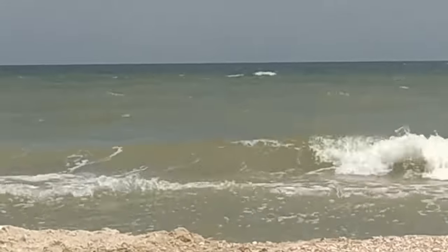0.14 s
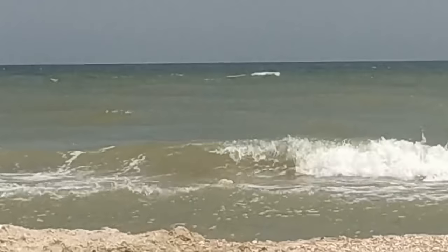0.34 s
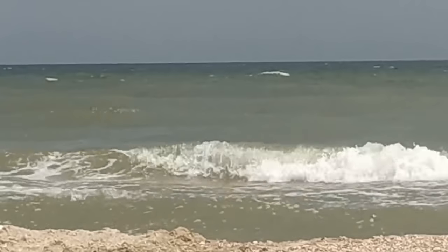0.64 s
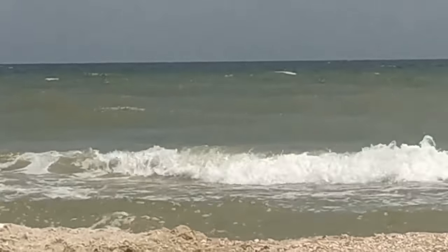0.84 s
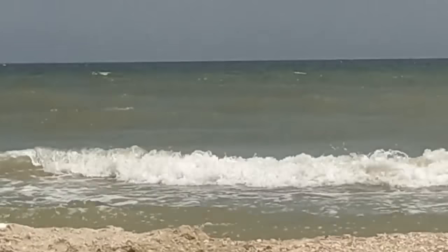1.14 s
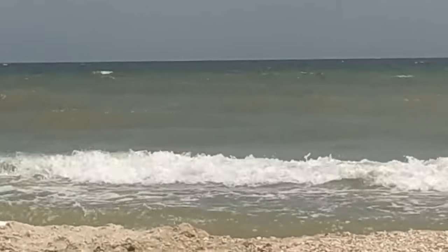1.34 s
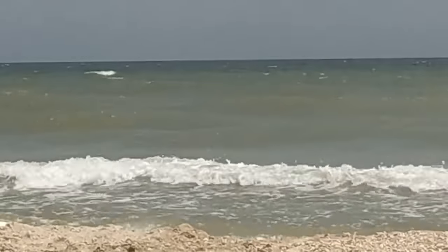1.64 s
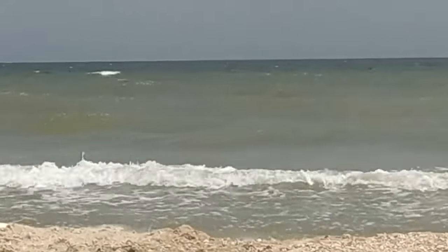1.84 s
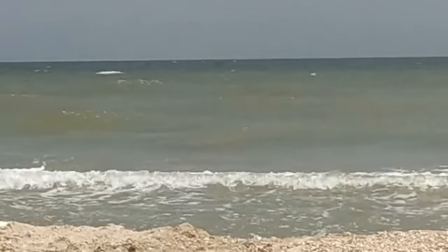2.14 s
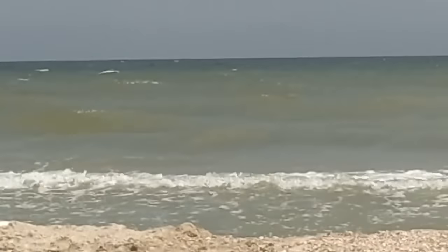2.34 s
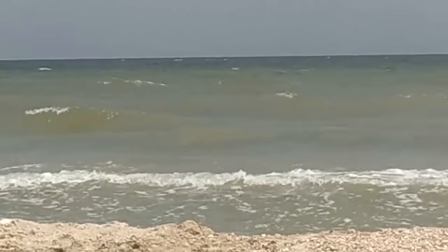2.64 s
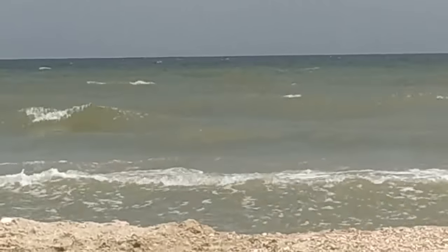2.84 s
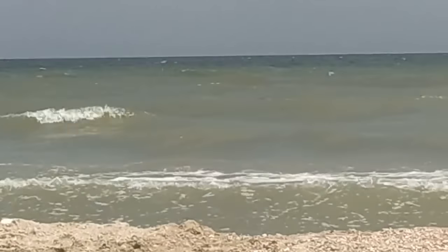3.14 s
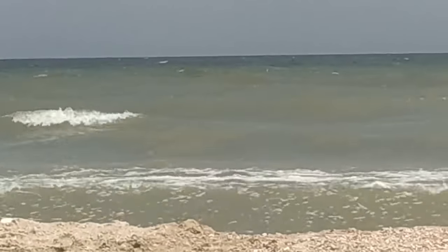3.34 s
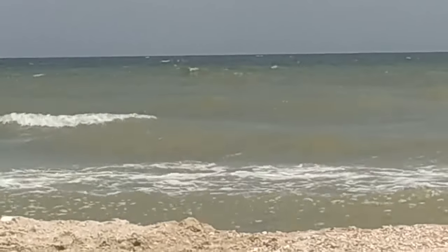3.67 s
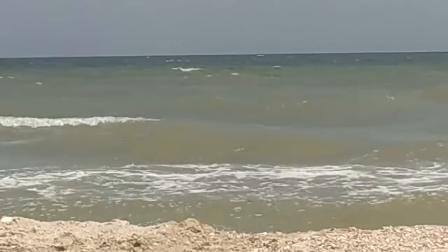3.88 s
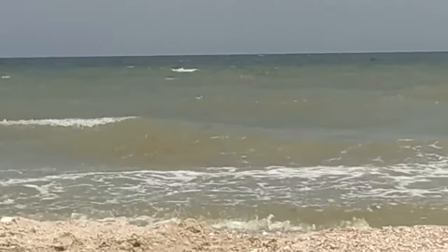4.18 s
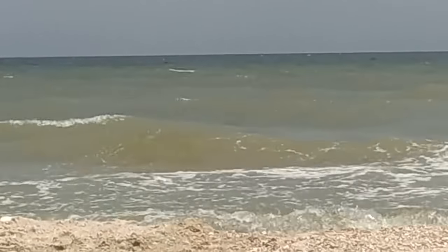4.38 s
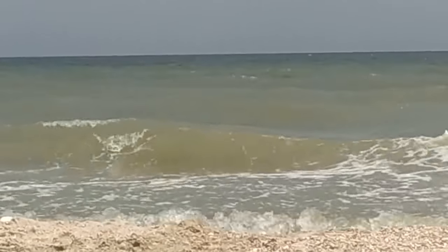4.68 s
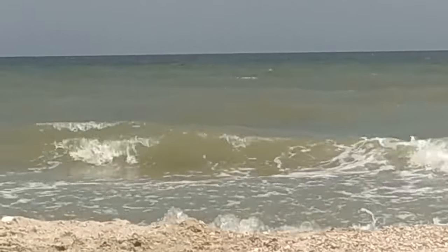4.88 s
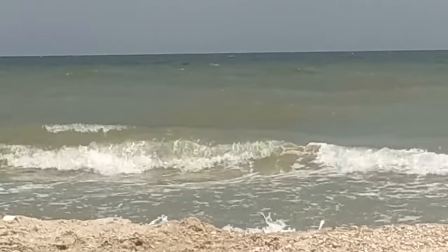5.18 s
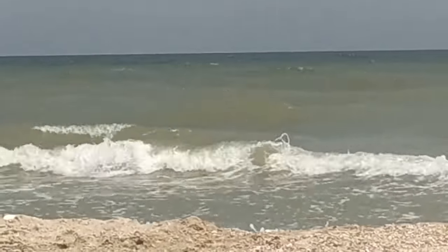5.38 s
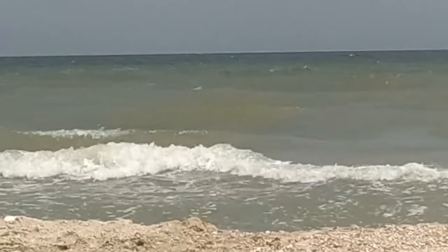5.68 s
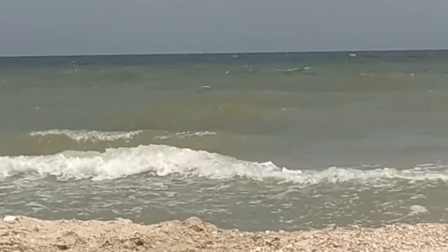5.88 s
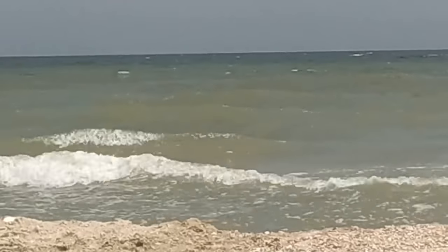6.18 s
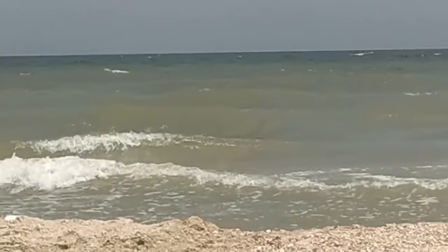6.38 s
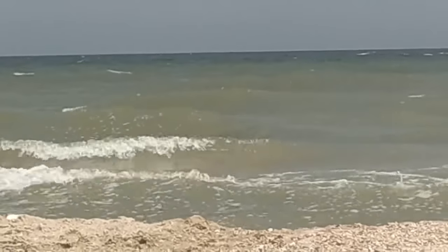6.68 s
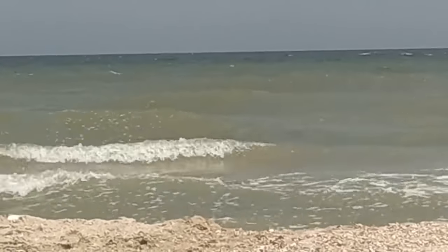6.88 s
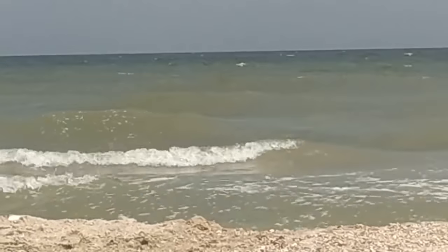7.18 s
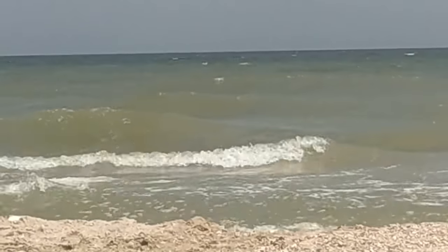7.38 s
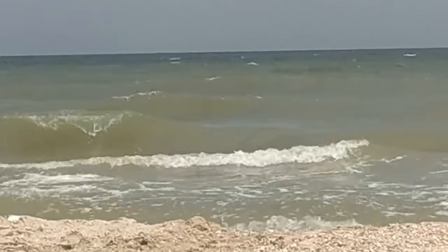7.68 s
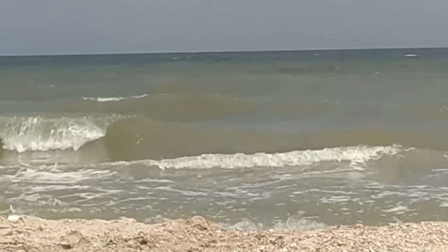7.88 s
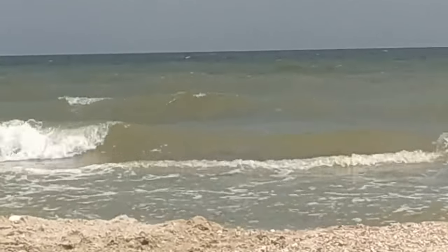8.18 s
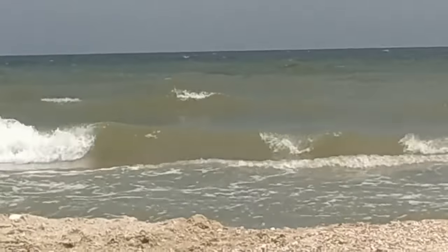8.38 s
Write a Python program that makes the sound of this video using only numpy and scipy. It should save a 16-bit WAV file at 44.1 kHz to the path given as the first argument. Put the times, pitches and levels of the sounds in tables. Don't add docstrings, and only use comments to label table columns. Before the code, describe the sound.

Small waves curl and collapse on a shell beach, a dull roar beneath a continuous, crisp hiss of bursting foam, brighter on the left. A few tiny spray ticks hit the microphone early on. A stronger breaker arrives midway, then wind buffets the microphone with low rumbles and ragged rasps while the final waves wash in and the foam grows loudest.

```python
import sys
import numpy as np
from scipy import signal
from scipy.fft import rfft, irfft, next_fast_len
from scipy.io import wavfile
from scipy.ndimage import uniform_filter1d

SR = 44100
rng = np.random.default_rng(int(sys.argv[2]) if len(sys.argv) > 2 else 0)


def wav_record(signal):
    frames = np.transpose(np.atleast_2d(signal))
    bounded = np.clip(frames, -1, 1)
    quanta = np.round(bounded * 32767).astype(np.int16)
    wavfile.write(sys.argv[1], SR, quanta)


def how_loud(loudness_db):
    steps = np.asarray(loudness_db, float) / 20
    return 10 ** steps


N = 375732

# frequency in Hz, level in dB.
FOAM_SPECTRUM = [(3500, -30), (6000, -10), (8000, -7), (10500, -1), (12500, -5), (15000, -14)]
# frequency in Hz, width in
# Hz, level in dB.
PORT_MODES = [
    [(1717, 650, 4.5), (9630, 896, 17)],
    [(546, 470, -7.5), (2120, 1800, -9.5), (8610, 680, 15)],
]


def evened(x):
    return x / np.sqrt(np.mean(x ** 2, -1, keepdims=True) + 1e-20)


def read(points, hz):
    f, value = np.transpose(points)
    return np.interp(np.log(hz + 1), np.log(f + 1), value)


def curves(rows):
    s, *columns = np.transpose(rows)
    return [np.interp(np.arange(N) / SR, s, c) for c in columns]


def filtered(x, gain):
    size = next_fast_len(N + 4096)
    hz = np.fft.rfftfreq(size, 1 / SR)
    return irfft(rfft(x, size) * gain(hz), size)[..., :N]


def coloured(points):
    white = rng.standard_normal((2, N))
    return evened(filtered(white, lambda hz: how_loud(read(points, hz))))


def wobble(hz, channels=2):
    white = rng.standard_normal((channels, N))
    return evened(filtered(white, lambda f: 1 / (1 + (f / hz) ** 2)))


def steadied(x, size):
    return x / np.sqrt(uniform_filter1d(x ** 2, size) + 0.12)


def humps(left, right, sharp):
    t = np.arange(0, N, 32) / SR
    gains = []
    for rows in (left, right):
        s, db, length = np.transpose(rows)
        shape = np.exp(-2 * (sharp * (t[:, None] - s) / length) ** 2)
        power = (how_loud(2 * db) * shape).sum(1)
        gains.append(np.sqrt(np.interp(np.arange(N) / SR, t, power)))
    return np.array(gains)


def eddies(push):
    # time in s, peak level in dB, length in s.
    left_eddies = [(0.703, -41, 0.061), (1.232, -43, 0.022), (1.694, -43, 0.038), (1.78, -42.5, 0.086),
                   (2.221, -37, 0.034), (2.432, -40.5, 0.076), (2.935, -49, 0.06), (3.608, -36.0, 0.037),
                   (4.294, -47, 0.045), (4.873, -39, 0.083), (5.02, -40, 0.046), (5.29, -39.5, 0.057),
                   (5.437, -41, 0.028), (5.528, -39.5, 0.032), (5.799, -43.5, 0.066), (6.117, -43, 0.053),
                   (6.259, -39.5, 0.024), (6.625, -36.0, 0.082), (6.694, -32.5, 0.024), (6.782, -32, 0.094),
                   (6.856, -38, 0.056), (6.952, -33.0, 0.075), (7.118, -31.5, 0.036), (7.291, -38.0, 0.051),
                   (7.469, -38.0, 0.053), (7.624, -37.0, 0.073), (7.902, -41, 0.024), (8.018, -35.5, 0.14),
                   (8.22, -38, 0.036), (8.434, -40.0, 0.033)]
    right_eddies = [(0.531, -52, 0.029), (0.748, -40, 0.018), (1.397, -45, 0.03), (1.527, -53, 0.075),
                    (2.221, -42, 0.026), (2.819, -49, 0.027), (3.075, -42, 0.022), (3.605, -49, 0.073),
                    (3.96, -53, 0.052), (4.255, -42, 0.024), (4.49, -47, 0.056), (4.652, -46, 0.079),
                    (4.865, -44, 0.045), (4.982, -52, 0.024), (5.149, -59, 0.048), (5.367, -46, 0.032),
                    (5.511, -39.5, 0.032), (5.573, -42, 0.034), (5.789, -40, 0.02), (6.365, -38, 0.025),
                    (6.672, -46, 0.037), (6.766, -34, 0.052), (6.899, -40, 0.035), (7.016, -40, 0.08),
                    (7.095, -37, 0.054), (7.356, -43.5, 0.047), (7.551, -55, 0.08), (7.828, -39, 0.083),
                    (7.933, -43, 0.067), (8.213, -38, 0.032)]
    small_db = -53 + 7.0 * wobble(hz=9.0)
    small = push ** .15 * how_loud(small_db)
    return np.hypot(humps(left_eddies, right_eddies, sharp=1.66), small)


def wind():
    # time in s, peak level in dB, length in s.
    left_gusts = [(1.338, -27, 0.18), (1.822, -30, 0.4), (2.434, -29.5, 0.69), (3.149, -22, 0.45),
                  (3.52, -37, 0.186), (3.803, -25.5, 0.25), (5.283, -21, 1), (5.559, -47, 0.68),
                  (6.175, -29, 0.31), (6.639, -19.5, 0.72), (7.819, -19.5, 0.337), (8.161, -21, 0.36)]
    right_gusts = [(0.629, -19.5, 0.65), (1.245, -34, 0.9), (1.737, -21, 0.12), (2.435, -25, 0.61),
                   (3.494, -19, 0.29), (5.195, -20, 0.48), (6.029, -28, 0.94), (6.389, -27, 0.89),
                   (6.9, -20.5, 1), (7.344, -16, 0.21), (7.854, -35, 0.24), (8.112, -18, 0.27)]
    # frequency in Hz, level in dB.
    push_spectrum = [(2, 0.5), (10, 2.5), (17, 3.5), (28, -29), (45, -32), (65, -40), (150, -56.5)]
    buffet_spectrum = [(20, -14), (45, 0), (62, -11), (85, -13), (125, -31), (185, -29), (250, -42),
                       (600, -60)]
    flutter_spectrum = [(30, -26), (60, -4.5), (85, 1), (125, -4), (175, 2), (250, -11.5), (340, -9.5),
                        (500, -19), (1000, -20), (3000, -54)]
    rasp_spectrum = [(150, -23), (250, -18), (340, -3.5), (480, -7), (600, -9.5), (900, -6), (1500, -22),
                     (3000, -45)]
    calm_db = np.array([[-39], [-31]])

    push = np.hypot(humps(left_gusts, right_gusts, sharp=2.06), how_loud(calm_db))
    push = push * how_loud(0.5 * wobble(hz=4.3))
    eddy = eddies(push)
    slow = push * steadied(coloured(push_spectrum), size=9000)
    buffet = how_loud(-36.0) * push ** .5 * how_loud(3.0 * wobble(hz=19.0)) * coloured(buffet_spectrum)
    flutter = how_loud(0.5) * eddy * steadied(coloured(flutter_spectrum), size=1300)
    ragged = evened(steadied(coloured(rasp_spectrum), size=900) * how_loud(2.5 * wobble(hz=60.)))
    rasp = how_loud(15.5) * eddy ** 1.555 * ragged
    return slow + buffet + flutter + rasp


def spray():
    # time in s, peak level in dB, left over right in dB.
    drops = [
        (0.7262, -9, 20),
        (2.1075, 0.5, 13),
        (2.3136, -13, 11),
        (2.4872, -17, 2),
        (2.794, -9, 14),
        (3.3398, -13, 3),
        (3.5547, -6, 14),
        (5.633, -12, 2),
        (6.8965, -8, 8),
        (7.0085, -9, 13),
    ]
    out = np.zeros((2, N))
    t = np.arange(72) / SR
    window = signal.windows.tukey(len(t), .4)
    for s, db, lean_db in drops:
        at = round(s * SR) + 18
        for c, modes in enumerate(PORT_MODES):
            treble_hz = modes[-1][0]
            ring = np.sin(2 * np.pi * treble_hz * t) * window
            out[c, at:at + len(t)] += how_loud(db + 5.0 - c * lean_db) * ring
    return out


def breakers():
    # start in s, time spent collapsing in s, roar level in dB.
    waves = [
        (0.0, 0.51, -43.5),
        (0.7, 0.81, -43.5),
        (1.4, 0.89, -42.5),
        (3.1, 0.63, -51),
        (4.1, 0.21, -45.5),
        (4.35, .95, -40),
        (5.5, 0.98, -48.5),
        (6.3, 1, -47.5),
        (7.0, 0.57, -44.5),
        (7.55, 0.85, -40.5),
    ]
    curl_s, drain_db_per_s, far_surf_db = .45, 21, -44.5
    t = np.arange(N) / SR
    power = how_loud(2 * far_surf_db)
    for s, length, db in waves:
        curl = np.sin(np.pi / 2 * np.clip((t - s) / curl_s, 0, 1))
        drain_db = drain_db_per_s * np.maximum(t - s - length, 0)
        power = power + (curl * how_loud(db - drain_db)) ** 2
    return 10 * np.log10(power)


def fizz(per_s, spread_db):
    size = how_loud(spread_db * np.minimum(rng.exponential(1, (2, N)), 5))
    sign = rng.choice([-1., 1.], (2, N))
    pops = size * sign * (rng.random((2, N)) < per_s / SR)
    return evened(filtered(pops, lambda hz: how_loud(read(FOAM_SPECTRUM, hz))))


def water(layers, patchy_db, surge_db):
    # frequency in Hz, left-right coherence from 0 to 1.
    likeness = [(90, 0.01), (450, 0.75), (1000, 0.28), (2000, 0.024), (5000, 0.1), (8000, 0.32),
                (11000, 0.028)]
    left_lag_s = 0.000228
    frames = N // 128 + 5
    hz = np.fft.rfftfreq(512, 1 / SR)
    a, b, c, d, patches = rng.standard_normal((frames, 257, 5)).T
    patches = uniform_filter1d(patches, size=10, axis=0)
    patches = uniform_filter1d(patches, size=14, axis=1)
    at = np.minimum(np.arange(frames) * 128, N - 1)
    surge = evened(uniform_filter1d(rng.standard_normal(frames), size=7))
    power = 0
    for points, level_db, splash_db in layers:
        splash = evened(uniform_filter1d(rng.standard_normal(frames), size=12))
        shape = evened(how_loud(read(points, hz)))[:, None]
        power = power + (shape * how_loud(level_db[:, None, at] + splash_db * splash)) ** 2
    same = np.clip(read(likeness, hz), 0, 1)[:, None]
    late = np.exp(-2j * np.pi * hz * left_lag_s)[:, None]
    right = a + 1j * b
    left = same * late * right + np.sqrt(1 - same ** 2) * (c + 1j * d)
    z = np.array([left, right]) * np.sqrt(power)
    z *= how_loud(patchy_db * patches / patches.std() + surge_db * surge)
    return signal.istft(z, nperseg=512, noverlap=384)[1][:, :N] / np.sqrt(256 / 1.5)


def ports(x):
    def ring(modes):
        return lambda hz: 1 + sum(how_loud(db) / (1 + 2j * (hz - f) / w) for f, w, db in modes)
    return np.array([filtered(v, ring(modes)) for v, modes in zip(x, PORT_MODES)])


def surf():
    # frequency in Hz, level in dB.
    roar_spectrum = [(120, -34), (250, -19.5), (330, -4.5), (500, -9.5), (800, -1.5), (1500, 1), (2200, -2),
                     (3500, -25.5), (8000, -37)]
    wash_spectrum = [(1200, -29), (2500, -6.5), (3500, -6.5), (4800, -8), (6000, -1.5), (7500, -7),
                     (10000, -11)]
    sizzle_spectrum = [(7000, -33), (10000, -4.5), (12000, 2), (14000, 2.5), (16000, -8)]
    # time in s, left level in dB, right level in dB,
    # fine spray above the foam in dB.
    swash = [(0, -17.5, -24.8, -1), (.45, -14, -30.5, 2.5), (.8, -18, -26, 4), (1.2, -17.5, -27, 2),
             (1.6, -17.5, -24, 0.5), (2.1, -16, -24.5, -0.5), (2.85, -17.5, -28, 0),
             (3.55, -15.5, -24.5, -2.5), (3.95, -16.5, -29, -1), (4.4, -14.5, -25.5, -1),
             (5.25, -14.5, -21.5, -1.5), (5.8, -17, -24.6, -1), (6.2, -15.5, -22, 0.5),
             (6.75, -15.5, -24, -0.5), (7.05, -14, -25, 3.5), (7.5, -13, -25, 3), (8.0, -12, -20.5, -0.5),
             (8.52, -11, -23.5, 1.5)]
    # level in dB, left port then right.
    port_db = [
        [-4],
        [1.13],
    ]
    low_cut_hz = 236

    *foam_db, spray_db = curves(swash)
    hiss_db = np.array(foam_db) + port_db
    roar_db = breakers()
    both = np.ones((2, 1))
    mean_hiss_db = hiss_db.mean(0)
    wash_db = -35.5 + 0.55 * (roar_db - roar_db.mean()) + 0.52 * (mean_hiss_db - hiss_db.mean())
    lean_db = hiss_db - mean_hiss_db
    sizzle_db = .6 * hiss_db[1] + .4 * hiss_db[0] + 0.47 * lean_db + spray_db - 6
    layers = [(roar_spectrum, both * roar_db, .6),
              (wash_spectrum, both * wash_db, 1.1),
              (FOAM_SPECTRUM, hiss_db - 9.5, .9),
              (sizzle_spectrum, sizzle_db, 1.0)]
    pops = how_loud(hiss_db - 17.5) * fizz(per_s=1100, spread_db=2.0)
    sea = water(layers, patchy_db=0.81, surge_db=0.33) + pops
    return ports(filtered(sea, lambda hz: .12 + 0.87 / (1 + (low_cut_hz / (hz + 1)) ** 8)))


def scene():
    return surf() + spray() + wind()


def band_limit(x):
    return signal.sosfilt(signal.butter(12, 15610, fs=SR, output="sos"), x)


def record(dry):
    bursts = [2.11, 6.635, 7.125]
    edge_hz = 14260
    full = np.clip(dry, -.9, .9)
    dull = filtered(full, lambda hz: hz < edge_hz)
    t = np.arange(N) / SR
    wide = sum(np.clip(2 - abs(t - s) / .005, 0, 1) for s in bursts)
    top = how_loud(-7.0) * wide * (full - dull) * [[1], [0]]
    return band_limit(dull + top)


dry = scene()
out = record(dry)
wav_record(out)
```